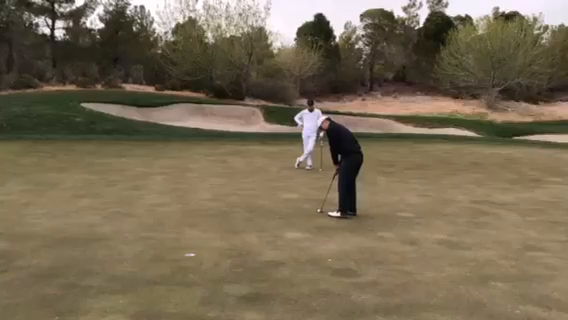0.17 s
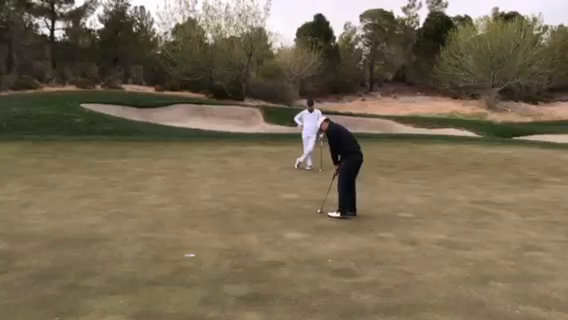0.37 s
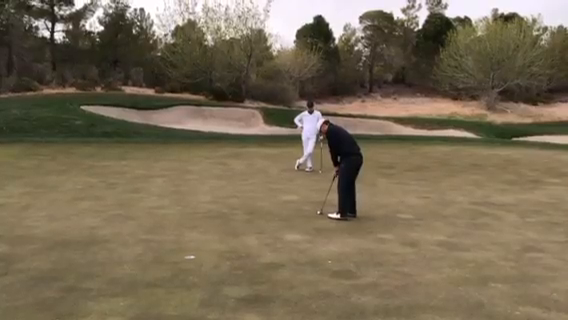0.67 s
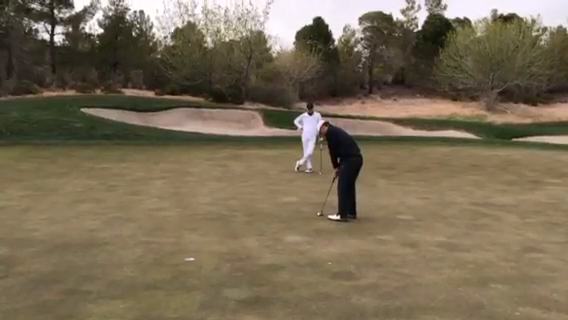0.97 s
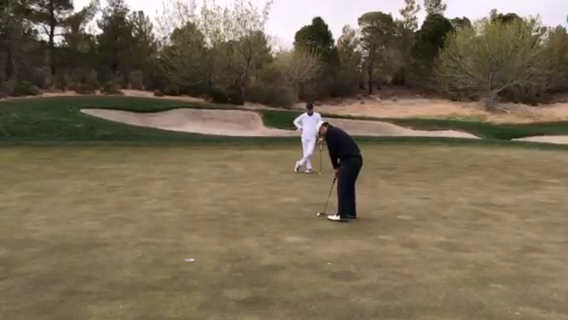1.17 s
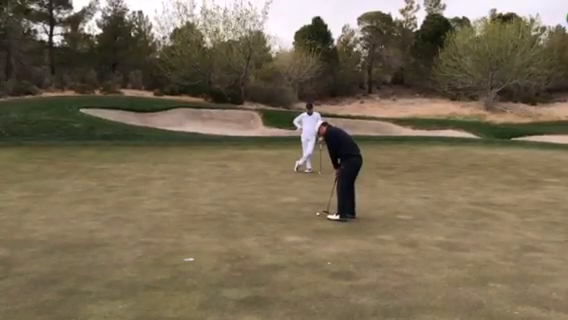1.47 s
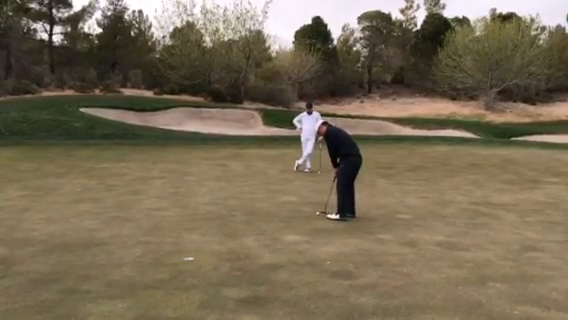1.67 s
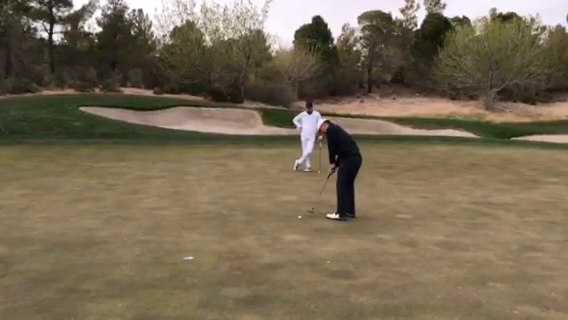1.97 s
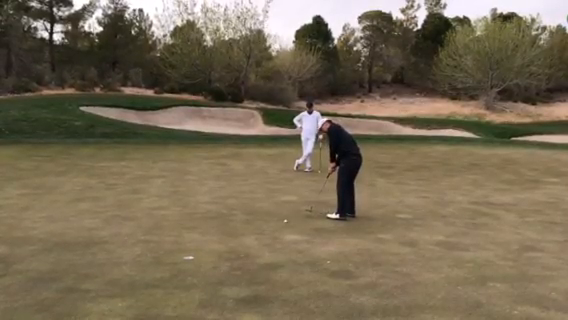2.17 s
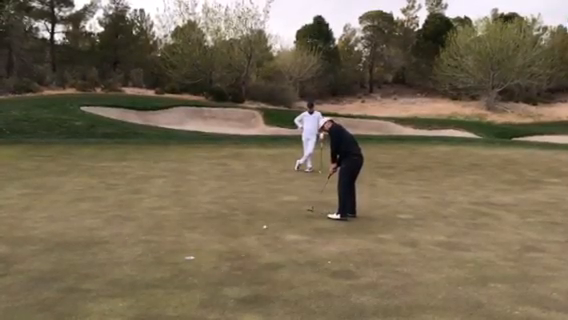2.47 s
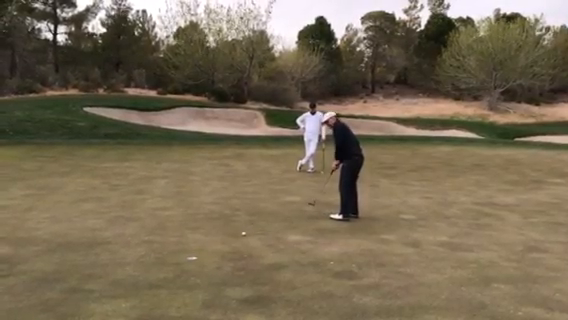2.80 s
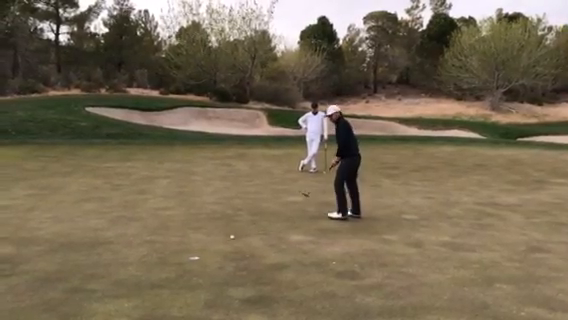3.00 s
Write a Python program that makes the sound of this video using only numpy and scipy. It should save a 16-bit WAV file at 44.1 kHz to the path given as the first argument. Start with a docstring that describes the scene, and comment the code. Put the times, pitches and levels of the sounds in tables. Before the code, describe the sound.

A putter taps a golf ball once, a sharp dry click some metres from the microphone, over far engine drone, traffic rumble and faint hiss; then a small bird chirps once.

```python
"""An open green, with the microphone some metres from a golfer, after a short silence at the start.
A far engine drones, slowly speeds up and eases at the end, over distant traffic, breeze and microphone hiss.
Faint rustles come early near the microphone; later a hollow roar swells twice inside the rumble.
Then a putter taps the ball, one short dry click of struck modes with a soft echo; a small bird chirps once.
The engine is wavering sines, the bird two gliding sines, and the air and hiss are coloured noise."""
import sys
import numpy as np
from scipy import signal
from scipy.fft import rfft, irfft, next_fast_len
from scipy.io import wavfile
from scipy.ndimage import uniform_filter1d, map_coordinates

SR = 44100
rng = np.random.default_rng(int(sys.argv[2]) if len(sys.argv) > 2 else 0)


def store_pcm(level_fs):
    """Save levels as 16-bit WAV."""
    pcm = np.round(np.clip(level_fs, -1, 1) * 32767).astype(np.int16)
    wavfile.write(sys.argv[1], SR, np.atleast_2d(pcm).T)


N = 138474  # length [samples]


def amp(db):
    """Turn decibels into a gain."""
    return 10 ** (np.asarray(db) / 20)


def unit(x):
    """Scale to rms 1."""
    return x / np.sqrt(np.mean(x ** 2) + 1e-20)


def curves(rows):
    """Draw one value per sample for each column after the time."""
    times, *columns = np.transpose(rows)
    return [np.interp(np.arange(N) / SR, times, column) for column in columns]


def wobble(rate):
    """A smooth random curve with `rate` knots a second."""
    knots = rng.standard_normal(int(N * rate / SR) + 4)
    return map_coordinates(knots, [np.arange(N) * rate / SR])


def filtered(x, response):
    """Multiply the spectrum of x by a response of frequency."""
    size = next_fast_len(N + SR // 2)  # padded, so the end does not wrap to the start
    return irfft(rfft(x, size) * response(np.fft.rfftfreq(size, 1 / SR)), size)[..., :N]


def rush(spectrum, patchy_db):
    """Coloured noise of rms 1 whose gain varies in random patches of time and frequency."""
    cells = signal.stft(rng.standard_normal(N), nperseg=512)[2]
    patches = uniform_filter1d(rng.standard_normal(cells.shape), size=6, axis=0)  # across frequency
    patches = uniform_filter1d(patches, size=14, axis=1)  # across time
    noise = signal.istft(cells * amp(patchy_db * unit(patches)), nperseg=512)[1][:N]
    freqs, db = np.transpose(spectrum)
    return unit(filtered(noise, lambda hz: amp(np.interp(np.log(hz + 1), np.log(freqs + 1), db))))


def tone(pitch):
    """A sine of rms 1 that follows a pitch curve from a random phase."""
    return np.sqrt(2) * np.sin(2 * np.pi * (np.cumsum(pitch) / SR + rng.random()))


def echoes(x, t60):
    """Scattered outdoor reflections: a noise tail of energy 1 that builds up, then decays."""
    t = np.arange(SR // 4) / SR
    tail = rng.standard_normal(len(t)) * amp(-60 * t / t60) * (1 - np.exp(-t / 0.0037))
    return signal.fftconvolve(x, tail / np.linalg.norm(tail))[:N]


def ring(modes, t):
    """Damped sine modes set off at t = 0."""
    return sum(np.sign(polarity) * amp(db - 60 * t / t60) * np.sin(2 * np.pi * hz * t)
               for hz, db, t60, polarity in modes)


# modes of the putter face: (frequency [Hz], level [dB], t60 [s], polarity [sign])
FACE_MODES = [(5406, -50, 0.0056, -1), (7950, -61.5, 0.008, 1), (9450, -57, 0.013, 1),
              (12700, -66, .005, 1), (14300, -57, .003, -1), (15300, -58, 0.0044, 1)]
# modes of the putter head, levels before the contact force smooths them:
# (frequency [Hz], level [dB], t60 [s], polarity [sign])
HEAD_MODES = [(819, -30.1, .0066, 1), (1297, -21.3, .0041, 1), (3190, -16.8, .0035, 1),
              (3691, -3.7, .0072, -1)]
TAP_S, CONTACT_S, FORCE_POWER = 1.899949, .00078, 1.25  # moment, length and roundness of the contact
BALL_DB, BALL_SLOPE_S = -13, .00025  # the ball's shove on the air, and weight of the force's slope in it
ECHO_DB, ECHO_T60_S, ECHO_HZ = -16.5, 0.12, 1490  # echo level, decay and low-pass corner


def putt():
    """One arch of contact force drives the head's modes and shoves the ball; first touch pings the face."""
    t = np.clip(np.arange(N) / SR - TAP_S, 0, .2)
    force = np.abs(np.sin(np.pi * np.clip(t / CONTACT_S, 0, 1))) ** FORCE_POWER
    force = force / force.sum()
    head = signal.fftconvolve(force, ring(HEAD_MODES, np.arange(SR // 10) / SR))[:N]
    ball = amp(BALL_DB) * (force + BALL_SLOPE_S * SR * np.gradient(force))
    click = head + ball + ring(FACE_MODES, t)
    # banks and trees answer, with the treble dulled
    answer = filtered(echoes(click, ECHO_T60_S), lambda hz: 1 / (1 + 1j * hz / ECHO_HZ))
    return click + amp(ECHO_DB) * answer


# the bird's lower voice, before roughness: (time [s], pitch [Hz], level [dB])
LOWER_VOICE = [(2.574, 7214, -96), (2.582, 7100, -81), (2.592, 6960, -76), (2.609, 6960, -73.5),
               (2.628, 7280, -75), (2.636, 7530, -79), (2.641, 7950, -77), (2.646, 8540, -83),
               (2.651, 8550, -96)]
# the bird's upper voice, before roughness: (time [s], pitch [Hz], level [dB])
UPPER_VOICE = [(2.566, 7950, -96), (2.573, 7750, -86), (2.586, 7420, -84), (2.598, 7230, -79),
               (2.61, 7100, -98)]
BIRD_ROUGH_DB, BIRD_ECHO_DB, BIRD_T60_S = 2, -5.5, 0.067


def bird():
    """Two whistled voices overlap: the upper falls away, the lower dips and then sweeps up."""
    t = np.arange(N) / SR
    call = 0
    for voice in (LOWER_VOICE, UPPER_VOICE):
        pitch, level_db = curves(voice)
        sounding = (t > voice[0][0]) * (t < voice[-1][0])
        call = call + amp(level_db + BIRD_ROUGH_DB * wobble(300)) * tone(pitch) * sounding
    return call + amp(BIRD_ECHO_DB) * echoes(call, BIRD_T60_S)


# the far engine, before waver and order gains: (time [s], firing pitch [Hz], level [dB])
ENGINE_SPEED = [(.1, 67.9, -53.5), (.17, 68.56, -55.5), (.35, 69.5, -53), (.52, 71.23, -45.5),
                (.61, 72.5, -50), (.68, 72.93, -60), (.85, 73.9, -51.5), (1.0, 75.25, -46.5),
                (1.08, 75.9, -52.5), (1.25, 76.6, -50.5), (1.39, 76.9, -56), (1.45, 77.4, -45.5),
                (1.64, 77.6, -50), (1.77, 78.3, -46), (1.9, 78.4, -55.5), (2.3, 80.23, -48),
                (2.6, 80.25, -50.5), (2.8, 78.6, -56.5), (2.92, 77.5, -50), (3.13, 73.46, -54)]
# strength of each firing order: (multiple of the firing pitch, level [dB])
FIRING_ORDERS = [(1, -1.5), (2, -22)]
FADING_DB, WAVER_HZ = 2.5, .9  # the air between makes it unsteady; fading grows with the order


def engine():
    """Firing orders on one wavering speed, each fading on its own."""
    pitch, level_db = curves(ENGINE_SPEED)
    pitch = pitch + WAVER_HZ * wobble(8)
    drone = sum(amp(db + FADING_DB * k * wobble(6.4)) * tone(k * pitch) for k, db in FIRING_ORDERS)
    return amp(level_db) * drone


# a lower hum, before waver and fading: (time [s], pitch [Hz], level [dB])
LOW_HUM = [(.1, 59.84, -56.5), (.3, 59.54, -52), (.55, 60.5, -55), (.8, 60.04, -55), (1.1, 63.02, -71),
           (1.4, 63.96, -56.5), (1.7, 61.8, -59), (2, 62.04, -57.5), (2.3, 61, -53.5), (2.6, 60, -57.5),
           (2.9, 57.75, -52), (3.13, 59.7, -63.5)]
HUM_FADING_DB, HUM_WAVER_HZ = 4, 1.32


def hum():
    """An unsteady low sine that beats with the engine drone above it."""
    pitch, level_db = curves(LOW_HUM)
    level = amp(level_db + HUM_FADING_DB * wobble(8))
    return level * tone(pitch + HUM_WAVER_HZ * wobble(10))


# a hollow roar that swells inside the rumble: (time [s], centre [Hz], level [dB])
HOLLOW_ROAR = [(.1, 250, -69.5), (.3, 250, -73), (.6, 230, -80), (1, 220, -76.5), (1.25, 230, -61),
               (1.45, 240, -71), (1.7, 248, -63.5), (1.95, 250, -73), (2.2, 300, -81.5), (2.45, 318, -76),
               (2.7, 315, -76), (3, 315, -69), (3.13, 315, -75.5)]
ROAR_WIDTH_HZ = 22  # offset from the centre where the amplitude is halved


def roar():
    """A narrow band of noise carried along a moving centre by two slow noises in quadrature."""
    centre, level_db = curves(HOLLOW_ROAR)
    slow = filtered(rng.standard_normal((2, N)), lambda hz: 1 / (1 + (hz / ROAR_WIDTH_HZ) ** 2))
    turn = 2 * np.pi * np.cumsum(centre) / SR
    return amp(level_db) * unit(slow[0] * np.cos(turn) + slow[1] * np.sin(turn))


# colour of the distant traffic rumble: (frequency [Hz], level [dB])
RUMBLE_COLOUR = [(20, -29.5), (32, -22), (40, -14), (52, -6), (70, 1.5), (88, 0), (100, -1), (130, -5.5),
                 (180, -8.5), (240, -12.5), (320, -17.5), (420, -24), (700, -53.5)]
# its course, before a slight sway: (time [s], level [dB])
RUMBLE_COURSE = [(.1, -55.5), (.3, -55), (.6, -56), (1, -55.5), (1.4, -56.5), (1.8, -54), (2.2, -56),
                 (2.7, -56), (3.13, -57)]


def traffic_rumble():
    """Distant traffic: low noise with a slightly swaying level."""
    return amp(curves(RUMBLE_COURSE)[0] + 0.89 * wobble(6.9)) * rush(RUMBLE_COLOUR, patchy_db=2.0)


# colour of the breeze on the microphone: (frequency [Hz], level [dB])
BUFFET_COLOUR = [(20, -26), (30, -8), (38, 1), (48, -2), (60, -19.5), (100, -61)]
# its course: (time [s], level [dB])
BUFFET_COURSE = [(.1, -60.5), (.4, -63), (.8, -59), (1.1, -72.5), (1.5, -68.5), (2, -67), (2.45, -62),
                 (2.8, -65), (3.13, -62)]


def breeze_buffet():
    """Breeze pushing on the microphone: very low noise that comes and goes."""
    return amp(curves(BUFFET_COURSE)[0]) * rush(BUFFET_COLOUR, patchy_db=2.0)


# colour of the wash of trees and road: (frequency [Hz], level [dB])
WASH_COLOUR = [(210, -29), (350, -5), (409, -5), (447, -3), (483, 0.5), (1030, -3), (1380, -7),
               (2450, -12.5), (5000, -28), (6500, -42), (11000, -120)]
# its course, before a slight sway: (time [s], level [dB])
WASH_COURSE = [(.1, -68), (.4, -67.5), (.9, -67.5), (1.4, -67.5), (2, -68.5), (2.5, -68), (3.13, -67.5)]


def wash():
    """Trees and road far off: broad midrange noise, nearly steady."""
    return amp(curves(WASH_COURSE)[0] + .5 * wobble(4.88)) * rush(WASH_COLOUR, patchy_db=0.43)


# faint rustles near the microphone, before the bass is cut: (time [s], level [dB])
RUSTLE_PUFFS = [(.134, -74), (.142, -74), (.161, -71), (.251, -76)]
RUSTLE_S = .004  # each puff peaks this long after its time


def rustles():
    """Tiny soft puffs of treble noise, with the colour of the hiss."""
    t = np.arange(N) / SR
    puffs = sum(amp(db) * np.exp(-((t - start) / RUSTLE_S - 1) ** 2) for start, db in RUSTLE_PUFFS)
    return puffs * filtered(rush(HISS_COLOUR, patchy_db=2), lambda hz: 1 / (1 + (4500 / (hz + 1)) ** 4))


# colour of the microphone hiss: (frequency [Hz], level [dB])
HISS_COLOUR = [(2350, -4.5), (4000, -2.5), (4930, -8), (5970, -4), (7660, -9.5), (9330, -6.5), (10400, -14),
               (11500, -8), (14200, -7), (15200, -8.5), (16000, -15.5)]
# its course: (time [s], level [dB])
HISS_COURSE = [(.1, -78), (.35, -79.5), (.6, -80), (1.8, -80), (3.13, -79.5)]


def hiss():
    """The microphone's own hiss: nearly even treble noise."""
    return amp(curves(HISS_COURSE)[0]) * rush(HISS_COLOUR, patchy_db=0.16)


def scene():
    """Add every source, near and far, into one channel."""
    near = putt() + rustles()
    far = bird() + engine() + hum() + roar() + traffic_rumble() + wash()
    microphone = breeze_buffet() + hiss()
    return (near + far + microphone)[None]


START_S, TOP_HZ = .0835, 15780  # the sound sets in; upper band limit


def record(dry):
    """Keep silence until the start, and cut steeply above the band limit."""
    on = np.clip((np.arange(N) / SR - START_S) / 0.00043, 0, 1)
    return filtered(dry * on, lambda hz: 1 / (1 + (hz / TOP_HZ) ** 200))


dry = scene()
out = record(dry)
store_pcm(out)
```